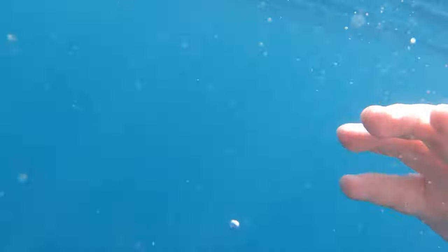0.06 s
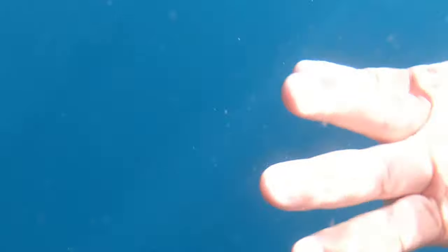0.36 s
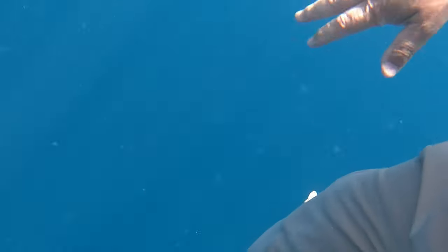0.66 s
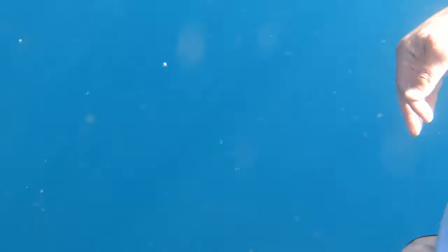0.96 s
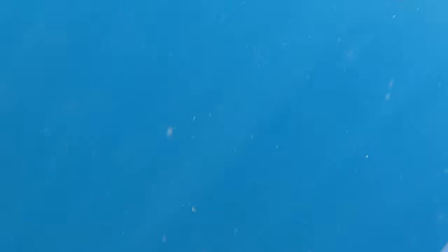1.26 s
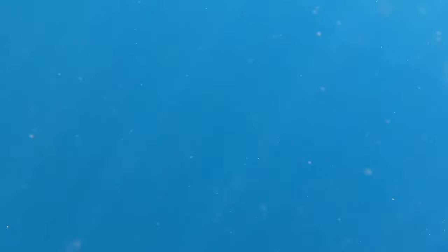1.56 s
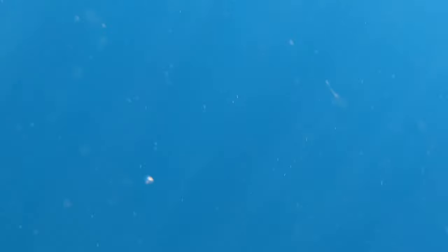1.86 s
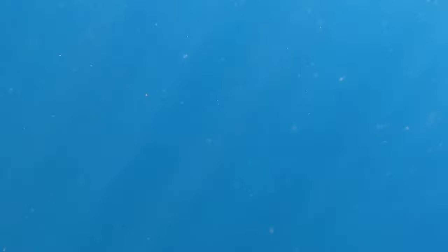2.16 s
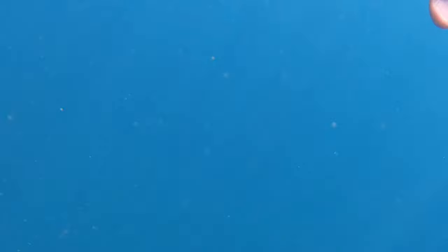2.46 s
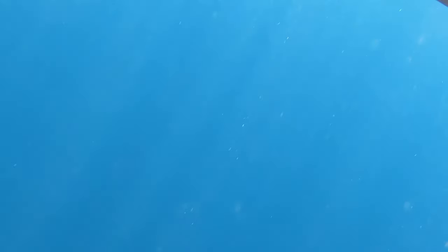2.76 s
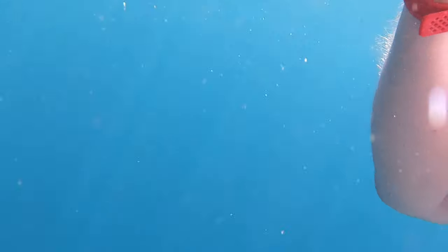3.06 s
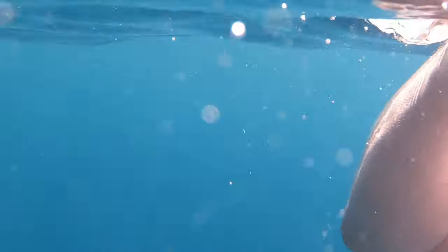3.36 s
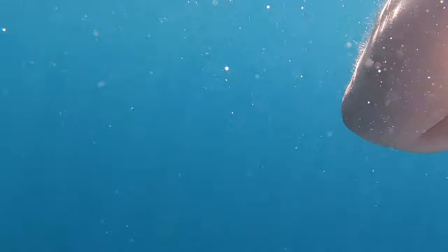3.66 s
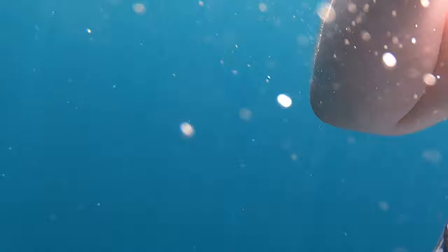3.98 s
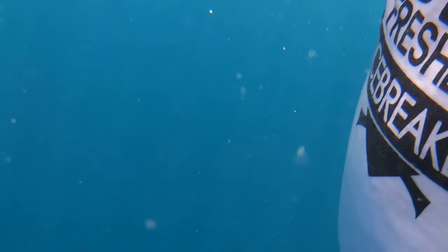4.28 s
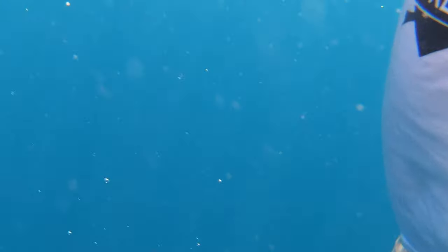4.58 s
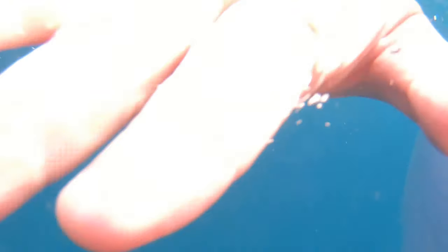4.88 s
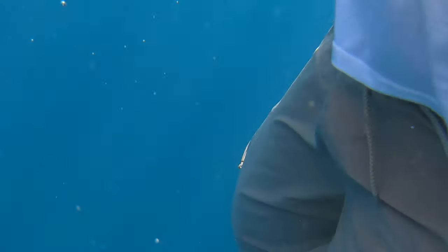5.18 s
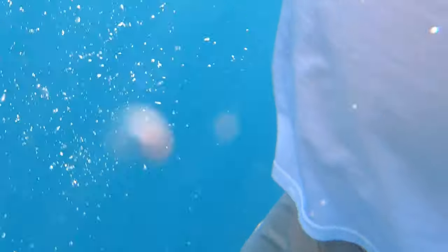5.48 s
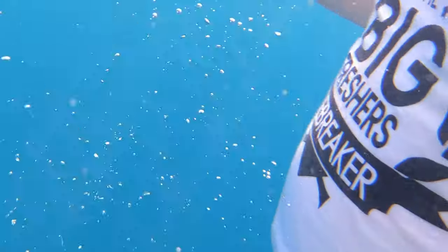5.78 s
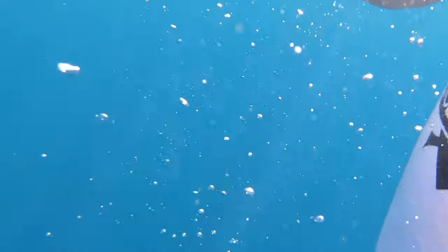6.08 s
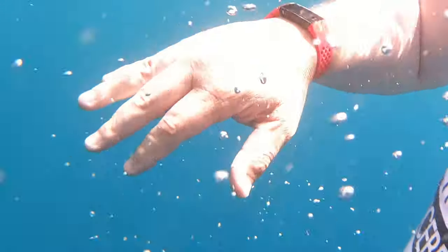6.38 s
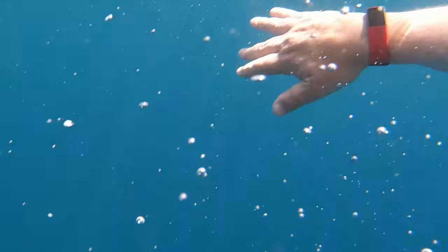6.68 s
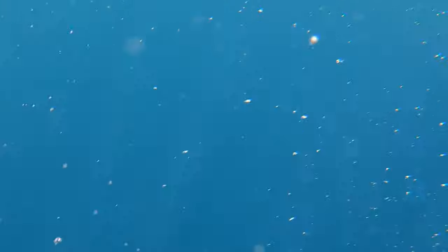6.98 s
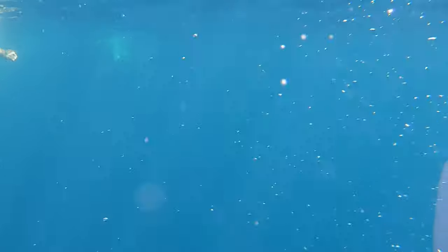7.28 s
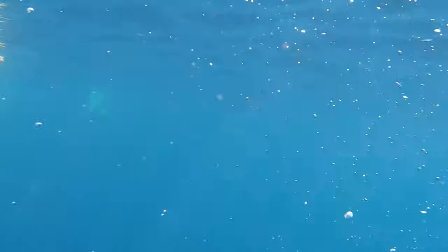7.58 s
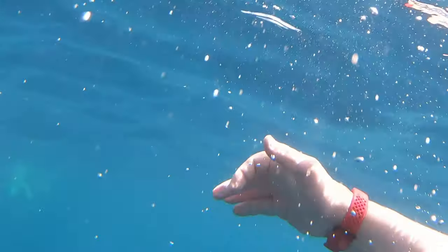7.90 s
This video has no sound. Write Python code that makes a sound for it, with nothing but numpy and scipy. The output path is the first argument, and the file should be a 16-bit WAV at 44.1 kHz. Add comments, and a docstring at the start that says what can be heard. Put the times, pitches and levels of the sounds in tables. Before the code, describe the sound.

A swimmer passes underwater, stirring up frothy surges, deep gurgles and small plinking bubbles over a low rumble.

```python
"""Swimmer passing an underwater camera

Just under the sea surface, large air pockets break loose in dull glugs and gurgle on.
Big bubbles ring in gliding tones; small ones plink and tick. Each stroke builds and fades
as a swish of froth and a surge against the housing, over a steady stir of water."""
import sys
import numpy as np
from scipy import signal
from scipy.fft import rfft, irfft
from scipy.io import wavfile
from scipy.ndimage import uniform_filter1d

SR = 44100
rng = np.random.default_rng(int(sys.argv[2]) if len(sys.argv) > 2 else 0)


def master(y):
    """Save y as 16-bit WAV."""
    cut = np.clip(np.atleast_2d(y).T, -1, 1)
    pcm = np.round(cut * 32767)  # scale
    wavfile.write(sys.argv[1], SR, pcm.astype(np.int16))


N = 354563
TIME_S = np.arange(N) / SR
RING_S = np.arange(SR // 8) / SR
BINS_HZ = np.fft.rfftfreq(N, 1 / SR)

# air pockets breaking loose: start_s, thump_db, thump_hz, ring_db, ring_hz, crack_db
GLUGS = [(0.155, -44, 257, -23.5, 710, -28.5), (0.422, -30.5, 157, -23.5, 840, -14),
         (0.803, -8, 150, -7.5, 683, -8), (0.89, -21, 215, -18, 750, -32),
         (0.912, -12, 151, -21, 711, -30.5), (0.979, -26, 158, -18.5, 780, -33),
         (1.014, -7, 182, -9, 660, -20), (1.072, -10, 197, -14.5, 704, -29.5),
         (1.09, -11, 182, -15.5, 714, -35), (1.782, -10.5, 223, -30, 620, -30.5),
         (2.024, -16.5, 160, -27.5, 947, -32), (2.116, -13, 152, -16, 515, -28),
         (2.305, -6.5, 168, -12.5, 775, -15.5), (2.714, -16, 152, -14, 640, -29),
         (2.734, -5.5, 183, -9.5, 727, -21.5), (2.84, -9.5, 159, -11.5, 790, -20.5),
         (2.93, -10, 158, -12.5, 790, -24.5), (3.044, -18.5, 240, -41, 645, -32.5),
         (3.504, -12, 216, -19.5, 580, -50), (3.527, -15.5, 150.5, -21.5, 630, -58),
         (3.588, -7, 178, -14, 704, -31), (3.704, -25.5, 122.4, -44, 663, -69),
         (3.958, -42, 180, -45.5, 700, -52), (4.169, -15, 125, -11.5, 664, -34),
         (4.706, -29, 173, -13, 636, -29), (4.715, -7, 147, -4.5, 696, -6),
         (4.748, -16, 183, -27, 630, -39), (4.786, -9.5, 160, -10, 693, -19),
         (4.802, -13.5, 172, -15.5, 827, -22), (4.822, -8, 156.5, -17.5, 730, -28),
         (5.086, -21, 155, -19.5, 720, -20), (5.099, -16.5, 99, -30, 730, -28),
         (5.419, -22, 156.8, -18.5, 560, -20), (5.488, -8.5, 164, -11.5, 690, -11),
         (5.497, -9.5, 162, -13.5, 630, -41), (6.41, -16, 198, -14, 610, -22.5),
         (6.885, -2, 161, -13, 680, -12.5), (6.899, -9, 170, -19, 816, -21),
         (6.914, -22, 177, -19.5, 656, -30.5), (7.465, -30, 122, -19, 565, -16),
         (7.504, -25, 244, -19, 650, -27), (7.533, -25.5, 216, -10.5, 930, -34),
         (7.546, -29, 240, -17, 900, -21)]
# spray spectrum: freq_hz, level_db
SPRAY_COLOUR = [(250, -16), (500, 4.5), (900, -8.5), (1300, -0.5), (1750, 6), (2600, -4.5), (3400, -6.5),
                (4500, -22.5), (8500, -24), (11500, -42), (16000, -72)]


def glugs(thump_rise_s=0.003564, lag_s=0.0014, hollow_hz=360, snap_db=-24):
    """A pocket's neck snaps shut and rings the housing; the slow swing of the air follows."""
    # housing modes, mid and high: pitch_hz, level_db, rise_s, pan_db, phase_rad
    crack_modes = [(1094, 2, 0.00065, 8, 3.39), (1667, -1, 0.00082, -7.5, 1.14),
                   (1875, -6.5, 0.00063, 8, 0.3), (2490, -12, 0.00059, -2, 0.44)]
    snap_modes = [(4560, -5, 0.00047, -18, 2.7), (6300, -18.5, 0.00021, 5, 0.5),
                  (9300, -21.5, 0.00087, 2, 4.3)]
    out = np.zeros((2, N))
    age = RING_S / thump_rise_s
    for start_s, thump_db, thump_hz, ring_db, ring_hz, crack_db in GLUGS:
        swing = age ** 2 * np.exp(2 * (1 - age) + 2j * np.pi * thump_hz * RING_S)
        add(out, start_s + lag_s, in_step(gain_of(thump_db) * swing))
        add(out, start_s, at_ports(mode(ring_hz, ring_db, rise_s=0.0013), pan_db=-8, phase_rad=-1.27))
        add(out, start_s + lag_s, in_step(mode(hollow_hz, ring_db - 13, rise_s=0.0022)))
        for modes, strike_db in ((crack_modes, crack_db), (snap_modes, crack_db + snap_db)):
            for hz, mode_db, rise_s, pan_db, phase_rad in modes:
                detune, strength = rng.standard_normal(2)
                ring = mode(hz * (1 + 0.081 * detune), strike_db + mode_db + 2.5 * strength, rise_s)
                add(out, start_s, at_ports(ring, pan_db, phase_rad))
    return out


def bubbles(attack_s=0.00045, damping=1.22, wobble=0.048, pinch_db=-12, echo=0.37, spray_db=-13):
    """A close bubble pinches off with a click and spray; its pitch wobbles with its shape."""
    # single bubbles: start_s, level_db, pitch_hz, nominal_t60_s, pan_db
    events = [(0.0797, -30, 1910, 0.0034, -2), (0.2303, -35, 2850, .062, 4),
              (0.2301, -24.5, 1820, 0.032, -7), (0.377, -33.5, 1950, .025, -1),
              (0.459, -36.5, 3070, 0.021, 4), (0.7012, -29.5, 1810, 0.059, -10),
              (0.7246, -29.5, 1790, 0.04, -18), (0.9702, -48, 2500, 0.045, 3),
              (1.9369, -16, 1800, .013, 4.5), (1.9627, -8.5, 903, .024, -6), (1.9993, -8.5, 780, 0.042, 0),
              (2.0236, -28, 1860, 0.091, -2), (2.05, -23, 980, .05, -6), (2.0525, -22, 1825, .037, -3),
              (2.0727, -16.5, 900, 0.087, -2), (2.0923, -22.5, 1684, 0.094, -4),
              (2.1257, -28.5, 2320, 0.026, 1), (2.133, -20, 1125, 0.067, 0), (2.1767, -19, 2040, 0.05, 3),
              (2.1827, -13.5, 1420, 0.021, -9), (2.2113, -26.5, 1610, 0.07, -1),
              (2.2454, -23, 1086, .05, -8), (2.2568, -20.5, 1023, 0.041, -4),
              (2.27, -28.5, 2720, 0.054, 1.5), (2.2955, -13, 1993, 0.034, -1),
              (2.3677, -34.5, 3380, .02, -2), (2.4103, -44.5, 3860, 0.024, -3),
              (2.4844, -26.5, 890, .11, -8), (2.5377, -26.5, 855, 0.053, -2),
              (3.322, -23, 900, 0.042, -0.5), (3.3299, -13.5, 2530, 0.019, -3),
              (3.3301, -13, 1680, 0.0067, 1), (3.42, -28.5, 1070, 0.016, 0),
              (3.487, -19.5, 1670, 0.008, 9.5), (4.0836, -32.5, 776, 0.021, -7.5),
              (4.114, -20.5, 1980, 0.02, -7), (4.1368, -16.5, 1670, 0.051, -14),
              (4.149, -14, 1740, 0.028, -10), (4.17, -20, 655, 0.16, 2.5), (4.1833, -15.5, 2760, 0.031, 7),
              (4.213, -20, 891, 0.14, -7), (4.2656, -17, 1220, 0.02, 4), (4.279, -20.5, 1410, 0.059, 11),
              (4.312, -25, 1305, 0.075, -1), (4.3288, -16, 2760, 0.026, 3), (4.328, -25.5, 1286, 0.11, 11),
              (4.3303, -26, 838, 0.081, 5), (4.36, -20, 1290, 0.05, 7), (4.611, -30.5, 1680, 0.03, -10),
              (4.6837, -24, 1587, 0.014, 3), (4.962, -31.5, 1690, .04, 5), (4.9958, -21.5, 1130, .074, 5.5),
              (5.1664, -31, 1061, .042, -2), (5.198, -32, 2880, .025, 0), (5.2366, -16.5, 3100, 0.0087, 4),
              (5.2738, -23.5, 2600, 0.005, 4), (5.6551, -34, 830, 0.06, -8), (5.8593, -26, 1610, .029, -24),
              (6.8504, -8, 2440, 0.012, 6), (6.8513, -8.5, 1255, 0.0073, 11),
              (7.4789, -12.5, 1450, 0.0083, 8.5), (7.5218, -20.5, 3020, 0.017, 10),
              (7.5935, -15, 1774, .065, -4), (7.6109, -20, 1770, .046, -5), (7.616, -22, 2620, 0.047, -10),
              (7.6706, -30, 1935, 0.085, -2), (7.671, -31.5, 2760, .056, -4), (7.7583, -27, 2020, 0.026, 6)]
    out, spray = np.zeros((2, N)), np.zeros((1, N))
    for start_s, db, hz, nominal_t60_s, pan_db in events:
        turn, delay, speed = rng.random(3)
        pitch_hz = hz * (1 + wobble * np.sin(2 * np.pi * (turn + (30 + 60 * speed) * RING_S)))
        t60_s = max(nominal_t60_s, 0.004) / damping
        envelope = (1 - np.exp(-RING_S / attack_s)) * gain_of(-60 * RING_S / t60_s)
        envelope /= envelope.max()
        ring = envelope * tone(pitch_hz) + mode(hz * 1.2, pinch_db, rise_s=0.27 / hz)
        sound = gain_of(db + 0.5) * at_ports(ring, pan_db, near_lag_rad(hz))
        add(out, start_s, sound)
        add(out, start_s + 0.00071 + 0.003305 * delay, -echo * sound)  # inverted surface reflection
        add(spray, start_s, gain_of(db + spray_db) * envelope[None] ** 2)
    return out + spray * coloured(rng.standard_normal((2, N)), SPRAY_COLOUR)


def pockets(swing_damping=15, sharpening=0.35, flutter_db=2):
    """Big bubbles sing almost pure, gliding tones; a wide swing rings sharp and dies fast."""
    # bubbles changing depth: start_s, level_db, base_hz, glide_hz_per_s, rise_s, small_swing_t60_s
    events = [(2.127, -22, 293.3, 750, 0.011, 0.43), (2.245, -16.5, 243.2, 651, .035, 0.5),
              (2.342, -15, 312, 284, 0.0045, 0.31), (2.3445, -4, 428.3, -5, 0.0028, 0.27),
              (2.471, -35.5, 424, 367, 0.029, 0.2), (2.535, -28.5, 449, 80, 0.0023, 0.13),
              (2.581, -34, 413, 340.5, 0.0072, 0.32), (4.238, -30, 166.8, -200, 0.077, 1),
              (4.461, -40, 483.4, 398, .03, 0.27)]
    out = np.zeros((2, N))
    for start_s, db, base_hz, glide_hz_per_s, rise_s, t60_s in events:
        t = np.arange(0, rise_s + min(t60_s / 2, 0.17), 1 / SR)
        loss = gain_of(60 * np.maximum(t - rise_s, 0) / t60_s)
        swing = 1 / ((gain_of(-db) + swing_damping) * loss - swing_damping)
        pitch_hz = (base_hz + glide_hz_per_s * t) * (1 + sharpening * swing)
        gate = np.minimum(t / rise_s, 1) ** 2 * np.minimum((t[-1] - t) / 0.02, 1)
        flutter = gain_of(flutter_db * drift(rate_hz=76)[:len(t)])
        add(out, start_s, in_step(np.sqrt(2) * gate * flutter * swing * tone(pitch_hz)))
    return out


def gurgle(per_s=75, centre_hz=232, scatter=0.13, cycles=4.6, rise_s=0.0038, ring_share=0.6):
    """Large bubbles leave in a train; their low rings overlap and beat over the stirred water."""
    # stirred water spectrum: freq_hz, level_db
    colour = [(40, -45), (85, -35), (120, -4.5), (165, -9.5), (205, 5), (250, -4.5), (300, -13.5),
              (355, -16), (420, -28.5), (700, -53), (1500, -100)]
    rings = np.zeros((2, N))
    for k, (jitter, size, strength, turn) in enumerate(rng.standard_normal((int(per_s * N / SR), 4))):
        hz = centre_hz * np.exp(scatter * np.clip(size, -2, 2))
        envelope = gain_of(2 * strength) * (1 - np.exp(-RING_S / rise_s)) * np.exp(-RING_S * hz / cycles)
        ring = envelope * np.exp(2j * np.pi * (hz * RING_S + turn))
        add(rings, (k + 0.5 * jitter) / per_s, in_step(ring))
    rings = steadied(evened(rings), span_s=0.018)
    stirred = swarm(colour, per_s=110, spread_db=1, hiss=0.58, clump_db=-3, span_s=0.08)
    return np.sqrt(gush_power("gurgle")) * (np.sqrt(ring_share) * rings + np.sqrt(1 - ring_share) * stirred)


def ticks(rise_s=0.00027, spit_db=-5, spit_decay_s=0.0025):
    """A tiny bubble bursts at the housing, or a loud glug snaps sharply; each rings inside a short spit of
    fizz."""
    # bursts and glug snaps: start_s, level_db, pitch_hz
    events = [(0.0804, -37, 4050), (0.156, -31, 4200), (0.3977, -36, 9400), (0.577, -42, 5940),
              (0.803, -27, 5850), (1.8792, -26.5, 4650), (1.9014, -26.5, 4700), (1.9349, -18.5, 5380),
              (1.952, -25.5, 3650), (1.99, -13, 5100), (2.062, -24, 4870), (2.1047, -24.5, 5130),
              (2.1975, -24, 5300), (2.2445, -20, 4870), (2.5881, -34.5, 8800), (3.3212, -34.5, 5400),
              (3.3314, -34, 7700), (3.422, -34.5, 4000), (3.484, -18, 6300), (4.11, -30, 8900),
              (4.163, -9.5, 6360), (4.2135, -27.5, 4150), (4.6829, -25, 6700), (4.715, -21.5, 4630),
              (5.087, -19.5, 5000), (5.098, -19, 5100), (5.1178, -22.5, 5760), (5.2364, -28.5, 7860),
              (5.419, -32, 4730), (5.8627, -24.5, 7300), (6.066, -32.5, 5270), (6.8375, -26.5, 5850),
              (6.85, -25, 3950), (6.886, -31, 4730), (6.959, -43.5, 4470), (6.9826, -40, 9350),
              (7.052, -37, 4200), (7.523, -23, 4100), (7.5522, -26.5, 4660), (7.5927, -22, 8700),
              (7.6198, -18.5, 3780), (7.834, -38, 4050)]
    # spit spectrum: freq_hz, level_db
    colour = [(900, -27), (2000, 6.5), (3200, 9.5), (4500, -2.5), (8500, -1), (10500, -12),
              (12000, -27), (16000, -32.5)]
    out, spit = np.zeros((2, N)), np.zeros((1, N))
    for start_s, db, hz in events:
        add(out, start_s, at_ports(mode(hz, db, rise_s), pan_db=-2, phase_rad=near_lag_rad(hz)))
        add(spit, start_s, gain_of(db + spit_db) * np.exp(-RING_S[None] / spit_decay_s))
    return out + spit * coloured(rng.standard_normal((2, N)), colour)


def splashes():
    """An arm breaks the surface and throws a dense spray of pops."""
    # arm slaps: start_s, length_s, level_db
    slaps = [(2.034, 0.02, -50), (2.171, 0.03, -29.5), (2.291, 0.031, -36), (4.113, 0.1, -26),
             (4.332, 0.1, -32.5), (5.074, 0.029, -28), (5.828, 0.046, -33.5), (6.337, 0.061, -33),
             (6.862, 0.04, -27)]
    envelope = np.zeros((1, N))
    for start_s, length_s, db in slaps:
        add(envelope, start_s, gain_of(db) * signal.windows.tukey(int(length_s * SR), 0.5)[None])
    return envelope * swarm(SPRAY_COLOUR, per_s=1900, spread_db=10, hiss=0.94, clump_db=8, span_s=0.06)


def wash():
    """Limbs sweep clouds of bubbles along; thin clouds ring, dense ones hiss."""
    # limb sweeps: peak_s, build_s, fade_s, slosh_db, froth_db, fizz_db
    swishes = [(0.15, 0.071, 0.044, -37, -59, -73), (0.25, 0.033, 0.013, -45, -36.5, -83),
               (0.43, 0.044, 0.27, -53.5, -53.5, -70), (0.79, 0.14, 0.09, -40.5, -45, -67.5),
               (1.87, 0.2, 0.031, -43.5, -35, -62), (2.02, 0.19, 0.24, -29.5, -39.5, -55.5),
               (2.17, 0.026, 0.17, -36.5, -36, -52.5), (2.275, 0.038, 0.14, -28, -34.5, -59),
               (2.39, 0.045, 0.2, -53, -47.5, -80), (2.5, 0.24, 0.66, -50, -51.5, -72.5),
               (3.63, .03, 0.038, -57, -52, -71), (4.135, 0.074, 0.13, -38, -30.5, -48.5),
               (4.28, 0.022, 0.12, -31, -34, -57), (4.395, .09, 0.05, -45, -30.5, -41.5),
               (4.6, 0.53, .12, -40.5, -53, -68.5), (4.71, 0.12, 0.068, -30.5, -47, -61.5),
               (4.815, .04, .03, -29, -45, -66), (4.91, 0.085, 0.027, -36, -34.5, -59),
               (5.13, 0.29, 0.26, -39, -35.5, -51.5), (5.48, 0.014, 0.053, -37, -38.5, -66),
               (5.585, .06, 0.071, -25.5, -37, -65), (5.72, 0.02, 0.096, -30.5, -39, -67),
               (5.855, .12, 0.085, -37.5, -31.5, -51.5), (6.02, 0.51, .12, -45, -41, -60.5),
               (6.38, 0.24, 0.12, -39.5, -36, -54.5), (6.6, 0.062, 0.031, -30.5, -39, -58),
               (6.675, 0.063, 0.065, -31.5, -35.5, -58.5), (6.865, 0.066, 0.076, -59, -33.5, -66.5),
               (7.16, 0.13, 0.15, -48, -46, -63), (7.5, 0.24, 0.11, -49, -46, -61),
               (7.56, 0.12, 0.029, -29, -33, -50.5), (7.605, 0.015, 0.093, -46.5, -41, -51),
               (7.74, 0.055, 0.058, -41.5, -33.5, -54)]
    # cloud make-up: time_s, ringing_share, deep_share
    cloud = [(0, 0.13, 0.33), (.7, 0.2, 0.48), (.87, 0.35, 0), (1.149, 0.17, 0.5), (1.85, 0.28, 0),
             (1.97, 0.47, 0), (2.62, 1, 0.95), (2.8, 0.94, 0.47), (3.098, 0.18, 0.82), (3.3, 0, 0),
             (3.55, 0.76, 0.6), (4.3, 0.47, 0), (4.52, 0.77, 1), (4.82, 0.45, .1), (5.15, 0.53, 0.32),
             (5.6, 0.07, 0.13), (5.8, 0.46, 0.87), (6.8, .08, 0.53), (7.4, 0.14, 0.35), (8.04, 0.6, 0.75)]
    time_s, *shares = np.transpose(cloud)
    ringing, deep = (np.interp(TIME_S, time_s, share) for share in shares)
    slosh_power, froth_power, fizz_power = swell_power(swishes)
    # these follow the gurgle's large bubbles and die sooner
    gush_slosh, gush_froth = (gush_power(layer, attack_s=0.037, fade_db_per_s=600.5)
                              for layer in ("slosh", "froth"))
    gush_fizz = gain_of(-26) ** 2 * gush_froth
    return hush() * (over_stir(slosh_power + gush_slosh, stir_db=-12) * slosh(deep)
                     + over_stir(froth_power + gush_froth, stir_db=-18.5) * froth(ringing)
                     + over_stir(fizz_power + gush_fizz, stir_db=-38.5) * fizz(ringing))


def slosh(deep_share):
    """Middling bubbles pop in a bright and a deep swarm."""
    # swarm spectra: freq_hz, level_db
    bright_colour = [(200, -57.5), (420, -13), (560, -11), (690, -3), (830, -1), (1000, -7), (1200, -12.5),
                     (1500, -22.5), (3000, -63.5)]
    deep_colour = [(200, -35), (350, -8.5), (430, -12.5), (510, 4), (620, 1), (740, -10.5), (900, -20.5),
                   (1200, -27), (2500, -67)]
    bright = swarm(bright_colour, per_s=250, spread_db=4.5, hiss=0.5, clump_db=4.5, span_s=0.2)
    deep = swarm(deep_colour, per_s=180, spread_db=3, hiss=0.18, clump_db=4, span_s=0.14)
    return blend(gain_of(3.5) * bright, deep, deep_share)


def froth(ringing_share):
    """Small bubbles blur into a hiss or plink separately."""
    # froth spectra: freq_hz, level_db
    dense_colour = [(600, -44), (1100, -1.5), (1320, -13), (1550, 3), (1820, 3.5), (2200, -11), (2700, -9),
                    (3050, -6), (3700, -17.5), (5000, -48.5)]
    thin_colour = [(750, -11.5), (1200, -3), (1750, 5), (2300, 5.5), (2900, 1.5), (4200, -20.5)]
    dense = swarm(dense_colour, per_s=650, spread_db=0, hiss=1, clump_db=5.5, span_s=0.05)
    thin = plinks(thin_colour, per_s=260, spread_db=2, cycles=7, low_hz=750, high_hz=4200, span_s=0.07)
    return blend(gain_of(-1.56) * dense, thin, ringing_share)


def fizz(ringing_share):
    """Tiny bubbles blur into a high hiss or prickle separately."""
    # fizz spectrum: freq_hz, level_db
    colour = [(2500, -36), (3900, 1.5), (5300, 2.5), (6000, -1.5), (6700, -7.5), (7400, -8.5), (9400, -5.5),
              (10400, -14.5), (11500, -27.5), (15000, -30.5)]
    dense = swarm(colour, per_s=810, spread_db=2, hiss=1, clump_db=6.5, span_s=0.29)
    thin = plinks(colour, per_s=310, spread_db=8, cycles=12, low_hz=3950, high_hz=10300, span_s=0.093)
    return blend(gain_of(5.5) * dense, thin, ringing_share)


def sizzle():
    """Dense puffs of fine bubbles sizzle in a narrow band."""
    # puffs: peak_s, build_s, fade_s, level_db
    puffs = [(5.59, 0.044, 0.018, -52), (5.85, 0.097, 0.033, -38.5), (6.39, 0.12, 0.065, -48),
             (6.68, 0.1, 0.073, -53.5)]
    # sizzle spectrum: freq_hz, level_db
    colour = [(4500, -49), (5600, -1.5), (6150, -1), (6600, -23.5), (7600, -35.5)]
    pops = swarm(colour, per_s=1500, spread_db=-2.5, hiss=0.98, clump_db=5.5, span_s=0.12)
    return np.sqrt(swell_power(puffs)) * pops


def current():
    """Water streams over the housing and sheds eddies; strokes and gushes push it harder."""
    # shoves of water: peak_s, build_s, fade_s, rumble_db, buffet_db, eddy_db
    surges = [(0.01, 0.15, 0.11, -30.5, -50, -55), (0.135, 0.12, 0.19, -53, -42.5, -37),
              (0.56, 0.36, 0.42, -31, -37.5, -47), (0.81, 0.012, 0.045, -36, -44, -25.5),
              (0.93, 0.067, 0.11, -43, -23.5, -61), (1.11, 0.027, 0.071, -39.5, -20.5, -60),
              (1.99, .05, .3, -26, -25.5, -56.5), (2.305, 0.03, .08, -31.5, -17.5, -74),
              (2.76, 0.08, .12, -43.5, -38, -63), (3.71, 0.028, 0.061, -47.5, -28, -62.5),
              (4.175, 0.11, 0.16, -29, -32.5, -35), (4.35, 0.21, 0.099, -40, -35, -68),
              (4.7, 0.1, 0.039, -14, -24, -32), (4.83, 0.088, .12, -30, -29, -34),
              (5.11, 0.06, 0.086, -32.5, -49, -36.5), (5.21, .08, 0.18, -31, -36, -42.5),
              (5.42, 0.058, 0.16, -28, -51, -58), (5.585, 0.12, 0.076, -39, -41, -32.5),
              (5.77, 0.15, 0.31, -30, -37, -36), (6.02, .2, 0.066, -38, -34, -68),
              (6.2, 0.086, 0.16, -37.5, -49, -71), (6.41, 0.095, 0.11, -21.5, -35, -32.5),
              (6.62, 0.15, 0.36, -32.5, -47, -38), (6.85, 0.29, 0.089, -27.5, -38, -52),
              (6.885, 0.021, 0.042, -43, -31, -19.5), (7.1, 0.089, 0.21, -33, -44.5, -46.5),
              (7.305, 0.022, 0.16, -28, -53, -63), (7.425, 0.035, 0.24, -29, -43, -47),
              (7.58, 0.11, 0.29, -34, -38.5, -43.5), (7.87, 0.51, 0.67, -35.5, -43.5, -53.5)]
    # pressure spectra: freq_hz, level_db
    rumble_colour = [(8, -35), (20, -7), (38, -3.5), (60, -6), (85, -20.5), (200, -60), (500, -100)]
    buffet_colour = [(35, -44.5), (70, 0.5), (110, 8), (155, -1.5), (210, -13.5), (400, -59.5), (900, -100)]
    eddy_colour = [(90, -32.5), (170, 3.5), (240, 3), (350, -12), (480, -9), (600, -17), (1500, -84.5)]
    rumble_power, buffet_power, eddy_power = swell_power(surges)
    buffet_power += gain_of(-13) ** 2 * gush_power("gurgle")
    rumble = over_stir(rumble_power, stir_db=0) * turbulence(rumble_colour, span_s=0.042)
    buffet = over_stir(buffet_power, stir_db=-5) * turbulence(buffet_colour, span_s=0.39)
    eddies = over_stir(eddy_power, stir_db=-12.5) * turbulence(eddy_colour, span_s=0.23)
    return rumble + gain_of(-1) * (buffet + eddies)


def far_ticks(per_s=11, base_db=-62, spread_db=5, low_hz=4500, high_hz=10000):
    """Stray tiny bubbles tick faintly throughout."""
    out = np.zeros((2, N))
    for when, height, strength in rng.random((int(per_s * N / SR), 3)):
        hz = low_hz * (high_hz / low_hz) ** height
        ring = mode(hz, base_db - spread_db * np.log(strength + 0.091), rise_s=0.0005)
        add(out, when * N / SR, at_ports(ring, 0, near_lag_rad(hz)))
    return out


def gush_power(layer, attack_s=0.026, fade_db_per_s=382):
    """Summed power of the gushes in one layer: each opens, holds and rings out."""
    # gushes of large bubbles: start_s, length_s, gurgle_db, slosh_db, froth_db
    gushes = [(0.844, 0.13, -30, -28.5, -49), (0.998, 0.021, -23.5, -50, -74),
              (1.065, 0.08, -25, -37, -46.5), (1.171, 0.027, -30, -52.5, -69),
              (1.269, 0.083, -22, -44.5, -47), (1.424, 0.072, -27, -46, -57),
              (1.53, 0.081, -28, -43, -49.5), (1.622, 0.031, -26, -43, -43), (1.707, 0.11, -25, -45.5, -63),
              (1.784, 0.092, -17, -44, -40), (1.982, 0.012, -19, -38.5, -53),
              (2.707, 0.088, -36.5, -38, -41), (2.787, 0.088, -30, -41.5, -44),
              (2.9, 0.053, -39.5, -39, -56), (2.978, 0.11, -31.5, -40, -57.5),
              (3.073, 0.047, -30, -50, -54.5), (3.138, 0.083, -31, -44.5, -58.5),
              (3.225, 0.082, -29.5, -38, -44.5), (3.319, 0.078, -34, -52, -54),
              (3.448, 0.11, -28, -43.5, -54), (3.557, 0.047, -23.5, -34.5, -47.5),
              (3.8, 0.1, -29.5, -47, -60.5)]
    column = ("gurgle", "slosh", "froth").index(layer)
    power = np.zeros(N)
    for start_s, length_s, *levels_db in gushes:
        age_s = TIME_S - start_s
        opening = np.sin(np.pi / 2 * np.clip(age_s / attack_s, 0, 1)) ** 2
        fade_db = fade_db_per_s * np.clip(age_s - length_s, 0, 1)
        power += (opening * gain_of(levels_db[column] - fade_db)) ** 2
    return power


def swell_power(swells, roundness=1.27):
    """Summed power per level column: each swell climbs 20 dB in build_s and drops 20 dB in fade_s."""
    power = np.zeros((len(swells[0]) - 3, N))
    for peak_s, build_s, fade_s, *levels_db in swells:
        near = slice(max(int((peak_s - 3 * build_s) * SR), 0), int((peak_s + 3 * fade_s) * SR))
        away = np.maximum((peak_s - TIME_S[near]) / build_s, (TIME_S[near] - peak_s) / fade_s)
        power[:, near] += (gain_of(levels_db)[:, None] * gain_of(-20 * away ** roundness)) ** 2
    return power


def hush(max_dip_db=-11.5, delay_s=0.041, width_s=0.016):
    """Gain of the wash: a brief dip after each glug, deeper after a strong one."""
    depth = np.zeros((1, N))
    dip = np.exp(-((RING_S[None] - delay_s) / width_s) ** 2)
    for start_s, thump_db, *_ in GLUGS:
        add(depth, start_s, gain_of(thump_db) * dip)
    return gain_of(max_dip_db * np.minimum(depth, 1))


def over_stir(power, stir_db):
    """Gain of a layer: its own power on top of the steady stir of the water."""
    # stir between strokes: time_s, level_db
    stir = [(0, -43), (.75, -43.5), (1.25, -46), (1.8, -44.5), (2.45, -42), (2.7, -50), (3.1, -55),
            (3.45, -46), (3.8, -55), (4.05, -47.5), (4.45, -38.5), (5.3, -42), (6.1, -53), (6.75, -32.5),
            (6.98, -50.5), (7.35, -45), (8.04, -43.5)]
    floor = gain_of(stir_db + np.interp(TIME_S, *np.transpose(stir)))
    return np.sqrt(power + floor ** 2)


def plinks(colour, per_s, spread_db, cycles, low_hz, high_hz, span_s, chirp=0.035):
    """A crowd of ringing bubbles; each pitch lifts a little as the bubble nears the surface."""
    out, t, colour_db = np.zeros((2, N)), RING_S[:SR // 30], spectrum(colour)
    for when, height, strength, side, turn, life in rng.random((int(per_s * N / SR), 6)):
        hz = low_hz * (high_hz / low_hz) ** height
        age = t * hz / (cycles * (0.5 + life))
        db = np.interp(hz, BINS_HZ, colour_db) - spread_db * np.log(strength + 0.032)
        envelope = gain_of(db) * (1 - np.exp(-age * 10)) * np.exp(-age)
        ring = envelope * tone(hz * (1 + chirp * np.tanh(age / 2)))
        add(out, when * N / SR, at_ports(ring, 10 * (side - 0.6), np.pi * (turn - 0.3)))
    return steadied(evened(out), span_s)


def swarm(colour, per_s, spread_db, hiss, clump_db, span_s):
    """Many pops of unequal size, in clumps, over the blur of farther ones."""
    size = gain_of(spread_db * np.minimum(rng.exponential(1, (2, N)), 4))
    pops = size * rng.choice([-1, 1], (2, N)) * (rng.random((2, N)) < per_s / SR)
    blur = hiss * rng.standard_normal((2, N))
    clumps = gain_of(clump_db * drift(rate_hz=35))
    return steadied(coloured((evened(pops) + blur) * clumps, colour), span_s)


def turbulence(colour, span_s):
    """Low-pitched pressure noise of moving water."""
    return steadied(coloured(rng.standard_normal((2, N)), colour), span_s)


def coloured(drive, colour):
    """Two unrelated excitations take on a colour and pass the two microphone ports."""
    # port pair: freq_hz, coherence, phase_rad, pan_db
    ports = [(330, .99, 0, -1), (520, .85, -.8, -6), (720, .8, -1.9, -6), (1000, .7, -3.4, -1),
             (1300, .7, -4.3, 3), (1700, .75, -5.4, -3), (2300, .7, -6.6, 1), (3500, .7, -5.6, 0),
             (5500, .75, -3.1, -5), (10000, .5, -2.5, -1)]
    coherence, phase_rad, pan_db = (spectrum(ports, column) for column in (1, 2, 3))
    left, other = rfft(drive) * gain_of(spectrum(colour))
    right = (coherence * left + np.sqrt(1 - coherence ** 2) * other) * np.exp(-1j * phase_rad)
    return evened(irfft(np.array([left * gain_of(pan_db / 2), right * gain_of(-pan_db / 2)]), N))


def at_ports(ring, pan_db, phase_rad):
    """A complex ring reaches the ports with unequal level and phase; positive pan is left."""
    sides = evened(gain_of([pan_db / 2, -pan_db / 2]))[:, None]
    return (sides * np.exp(0.5j * phase_rad * np.array([[1], [-1]])) * ring).imag


def in_step(ring):
    """Long waves reach both ports together, the right 1 dB louder."""
    return ring.imag * gain_of([[-0.5], [0.5]])


def near_lag_rad(hz):
    """Phase between the ports for a close bubble."""
    # port lag: pitch_hz, phase_rad
    lags = [(800, -0.93), (1080, -2.5), (1300, -5.5), (1800, -5), (2500, -6), (3200, -5.5), (4000, -7.5),
            (4800, -7.5), (6300, -11), (8700, -14.4)]
    return np.interp(hz, *np.transpose(lags))


def mode(hz, db, rise_s):
    """A heavily damped complex ring that peaks at rise_s."""
    age = RING_S / rise_s
    return gain_of(db) * age * np.exp(1 - age + 2j * np.pi * hz * RING_S)


def tone(pitch_hz):
    """Complex oscillator on a pitch curve."""
    return np.exp(2j * np.pi * np.cumsum(pitch_hz) / SR)


def steadied(x, span_s):
    """Evens out swells slower than span_s; keeps the quicker flutter."""
    power = uniform_filter1d((x ** 2).mean(0), int(span_s * SR))
    power = uniform_filter1d(power, int(span_s * SR / 2))
    return x / np.sqrt(np.abs(power) + 0.0068)


def drift(rate_hz):
    """Smooth random curve of unit rms."""
    return evened(irfft(rfft(rng.standard_normal(N)) * np.exp(-(BINS_HZ / rate_hz) ** 2), N))


def spectrum(points, column=1):
    """Interpolates a table over log frequency."""
    rows = np.array(points, float)
    return np.interp(np.log(BINS_HZ + 1), np.log(rows[:, 0]), rows[:, column])


def blend(a, b, b_share):
    """Equal-power crossfade."""
    return np.sqrt(1 - b_share) * a + np.sqrt(b_share) * b


def add(mix, start_s, sound):
    """Mixes a sound in at start_s."""
    part = mix[:, round(start_s * SR):][:, :sound.shape[1]]
    part += sound[:, :part.shape[1]]


def evened(x):
    """Scales to unit rms."""
    return x / np.sqrt(np.mean(x ** 2) + 1e-20)


def gain_of(db):
    """Decibels to amplitude."""
    return 10 ** (np.asarray(db) / 20)


def scene():
    """Open water, no reverberation."""
    return (glugs() + bubbles() + ticks() + far_ticks() + splashes() + gurgle() + pockets()
            + current() + wash() + sizzle())


def record(dry, cutoff_hz=16200):
    """The housing dulls the treble, peaks flatten at full scale, a low-pass limits the band."""
    # shell response: freq_hz, gain_db
    housing = [(20, 1), (9800, 0), (11200, -3), (16000, -5)]
    inside = irfft(rfft(dry) * gain_of(spectrum(housing)), N)
    clipped = inside / (1 + inside ** 12) ** (1 / 12)
    low_pass = signal.firwin(511, cutoff_hz, window=("kaiser", 9), fs=SR)
    return signal.oaconvolve(clipped, low_pass[None], "same")


dry = scene()
out = record(dry)
master(out)
```